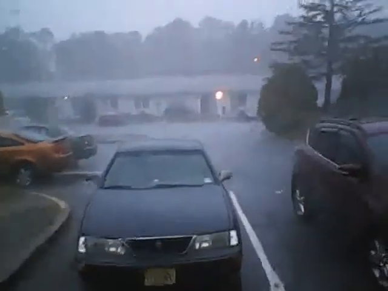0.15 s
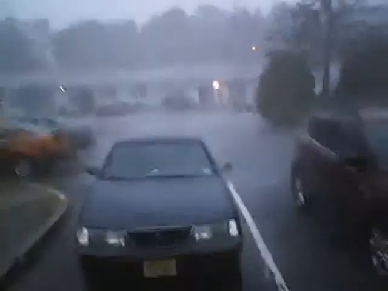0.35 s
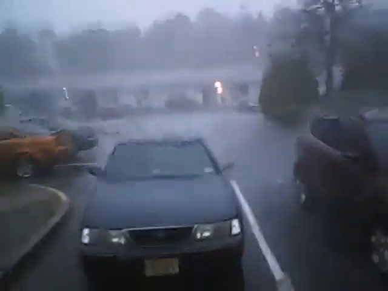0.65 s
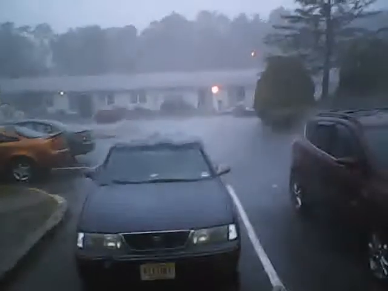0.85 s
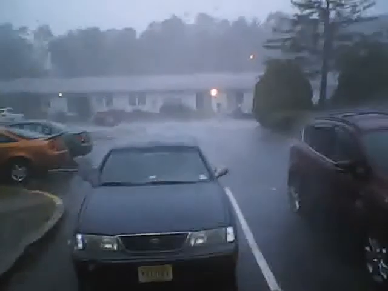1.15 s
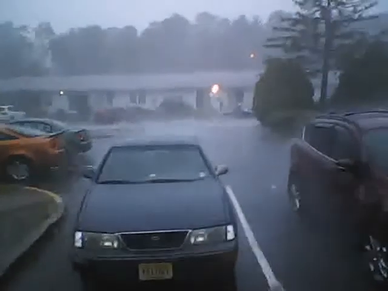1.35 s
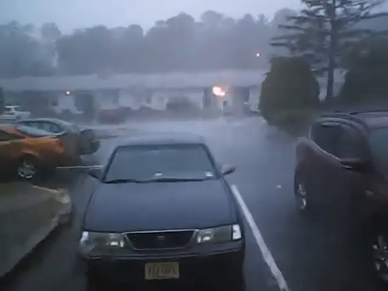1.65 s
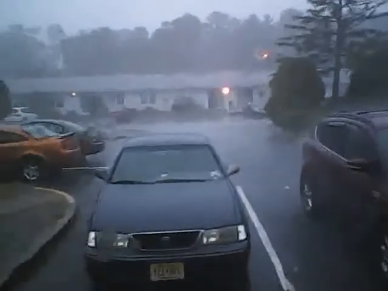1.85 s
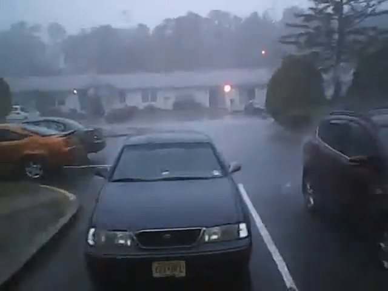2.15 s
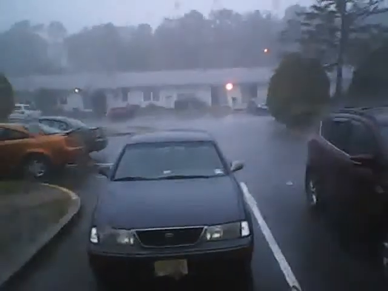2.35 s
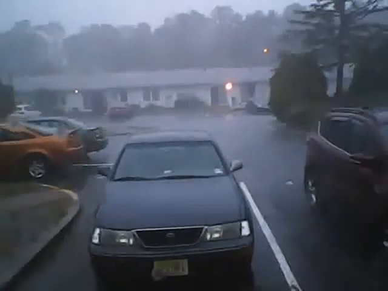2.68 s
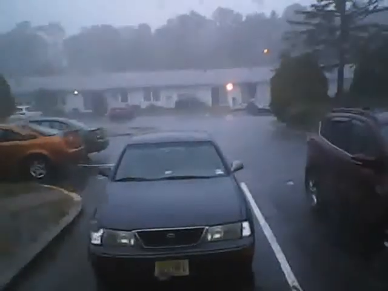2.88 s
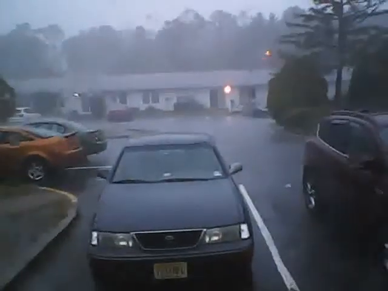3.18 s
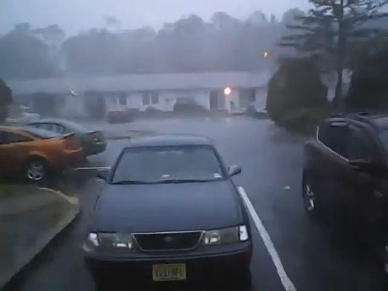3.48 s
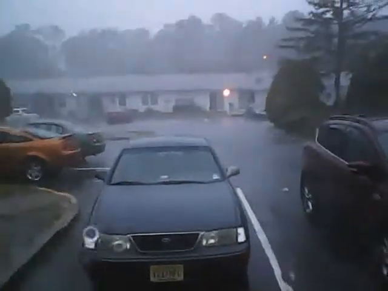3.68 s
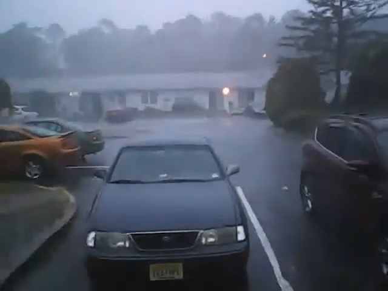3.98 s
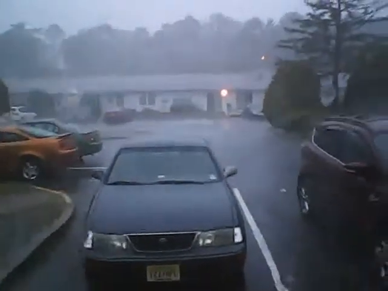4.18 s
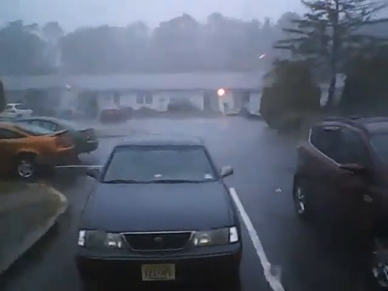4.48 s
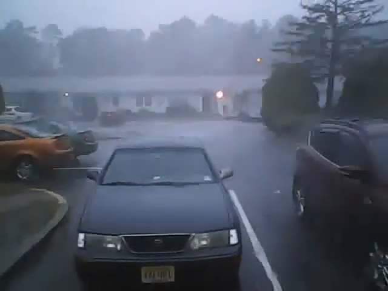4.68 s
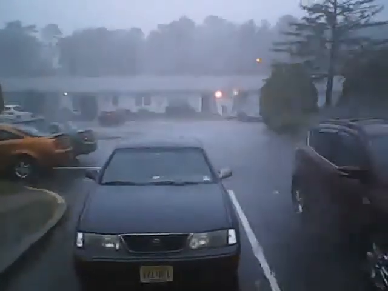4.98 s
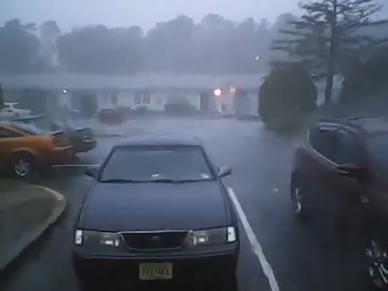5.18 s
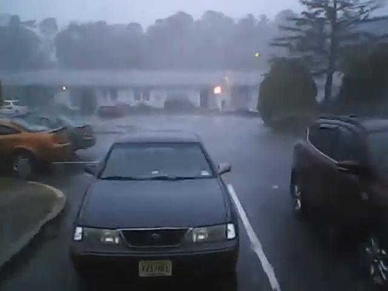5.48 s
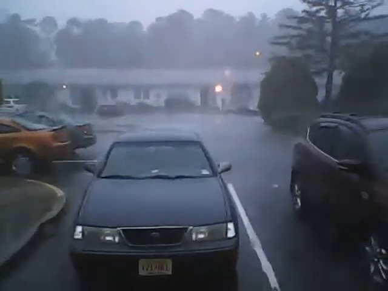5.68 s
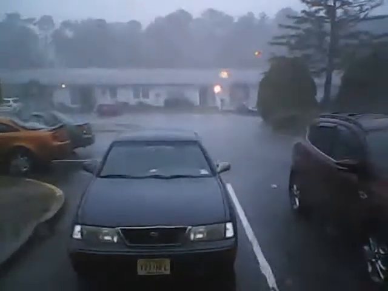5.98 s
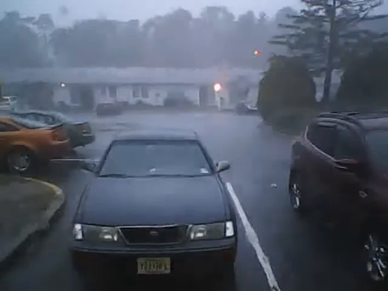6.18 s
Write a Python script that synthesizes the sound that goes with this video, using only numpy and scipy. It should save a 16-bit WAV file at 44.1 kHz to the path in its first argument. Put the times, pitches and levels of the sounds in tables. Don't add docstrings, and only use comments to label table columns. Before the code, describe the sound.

Heavy rain pours steadily on a parking lot, its wet asphalt, parked cars and trees, heard from under a shelter on a small handheld camera. A broad, even hiss of countless far drops runs throughout, thickened by a dense patter of nearer splats, over a low, uneven wind rumble that gusts gently. At about 0.25 s a sharp plastic click sounds as a hand shifts on the case, with a cluster of small ticks until 0.35 s. A short rub and more ticks come at 0.64-0.67 s, then faint ticks near 1.08 and 2.05 s. Brief low swells of booming rain on the shelter pass around 3.2 and 4.95 s. From about 3.4 s the downpour slowly strengthens, fullest near 6.1 s, then eases slightly by 6.3 s. The sound is boxy, with grainy, slightly broken treble that ends abruptly, and a barely audible, pulsing high whine.

```python
import sys
import numpy as np
from scipy import signal
from scipy.fft import rfft, irfft, next_fast_len
from scipy.io import wavfile
from scipy.ndimage import uniform_filter1d

SR = 44100
rng = np.random.default_rng(int(sys.argv[2]) if len(sys.argv) > 2 else 0)


def waveform_to_disk(signal):
    frames = np.transpose(np.atleast_2d(signal))
    scaled = np.clip(frames, -1, 1) * 32767
    samples = np.round(scaled).astype(np.int16)
    wavfile.write(sys.argv[1], SR, samples)


def how_loud(loudness_db):
    steps = np.asarray(loudness_db, float) / 20
    return 10 ** steps


N = 279153
WHINE_HZ = 10097.8


def evened(x):
    return x / np.sqrt(np.mean(x ** 2) + 1e-20)


def read(points, hz):
    f, value = np.transpose(points)
    return np.interp(np.log(hz + 1), np.log(f + 1), value)


def coloured(x, db_of):
    size = next_fast_len(N + 4096)
    gain = how_loud(db_of(np.fft.rfftfreq(size, 1 / SR)))
    return irfft(rfft(x, size) * gain, size)[..., :N]


def lift_db(humps, at):
    return sum(db / (1 + (2 * (at - centre) / width) ** 2) for centre, width, db in humps)


def downpour_db(t):
    # [t/s, level/dB]
    downpour = [(0, -46.5), (.25, -46), (.32, -44), (.44, -46), (1.13, -45.5), (1.36, -46.5), (1.9, -45.5),
                (2.1, -46.5), (3.12, -47), (3.21, -45.5), (3.42, -45), (3.81, -44.5), (4.62, -44),
                (4.9, -44.5), (5.73, -43.5), (6.12, -42), (6.33, -43.5)]
    return np.interp(t, *np.transpose(downpour))


def hiss(patchy_db=0.55, flicker_db=.5):
    frames = N // 128 + 9
    real, imaginary, patches = rng.standard_normal((frames, 257, 3)).T
    patches = uniform_filter1d(patches, size=6, axis=0)
    patches = evened(uniform_filter1d(patches, size=24, axis=1))
    flicker = evened(uniform_filter1d(rng.standard_normal(frames), size=8))
    spectra = (real + 1j * imaginary) * how_loud(patchy_db * patches + flicker_db * flicker)
    return evened(signal.istft(spectra, nperseg=512, noverlap=384)[1][:N])


def drops(per_s=2500, spread_db=0.0):
    size = how_loud(spread_db * np.minimum(rng.exponential(1, N), 5))
    size = size * (rng.random(N) < per_s / SR)
    pitches = np.geomspace(350, 9500, num=24)
    kind = rng.integers(0, len(pitches), N)
    out = np.zeros(N)
    for k, hz in enumerate(pitches):
        turns = np.arange(int(8 * SR / hz)) * hz / SR
        splat = turns * np.exp(-turns / 0.67) * np.sin(2 * np.pi * turns)
        splat = splat / np.sqrt(np.sum(splat ** 2) / hz)
        out += signal.oaconvolve(size * (kind == k), splat)[:N]
    return evened(out)


def rain(near_db=-8):
    # [f/Hz, level per Hz/dB]
    slope = [(150, -21.5), (250, -2.5), (457, -7.5), (943, -8.5), (1520, -9), (2010, -15), (3730, -13.5),
             (4290, -21.5), (6810, -20.5), (10000, -25.5), (13000, -54), (22000, -120)]
    # [t/s, length/s, lift/dB]
    on_roofs = [
        (.1, .1, 1),
        (.35, .3, -2),
        (1.06, .15, 0.5),
        (2, 0.4, 1.5),
        (5, 0.42, -1),
        (6.2, 0.22, 2.5),
    ]
    # [t/s, length/s, lift/dB]
    on_asphalt = [
        (.9, 1.9, -3),
        (2.5, 1.2, 3),
        (3.55, 0.18, 0.5),
        (4.3, 0.14, 0.5),
        (5.35, 0.38, 0.5),
    ]
    # [t/s, length/s, lift/dB]
    on_shelter = [
        (.45, 0.23, -2.5),
        (1.3, .2, 3.5),
        (2.95, 0.22, 2),
        (3.23, .15, 8),
        (4.3, 0.18, -8),
        (4.95, 0.17, 5.5),
        (6.25, 0.23, 3.5),
    ]
    # [t/s, length/s, lift/dB]
    in_trees = [
        (2.4, 2.0, -1.5),
        (4.0, .6, 0.48),
        (6.0, .8, 0.55),
    ]
    surfaces = [(on_roofs, 850, .5), (on_asphalt, 6500, .2), (on_shelter, 220, .4), (in_trees, 8200, .2)]
    t = np.arange(N) / SR
    both = evened(coloured(hiss() + how_loud(near_db) * drops(), lambda hz: read(slope, hz)))
    for sheets, centre_hz, octaves in surfaces:
        part = coloured(both, lambda hz: -6 * (np.log2((hz + 1) / centre_hz) / octaves) ** 4)
        both = both + (how_loud(lift_db(sheets, t)) - 1) * part
    return how_loud(downpour_db(t)) * both


def rumble(lumps_db=0.5):
    # [f/Hz, level per Hz/dB]
    wash_slope = [(3.5, -17), (6.0, -22), (16, -5.5), (32, -8), (181, -21), (234, -23), (303, -36),
                  (500, -51.5), (650, -67.5), (1100, -120)]
    # [t/s, lift/dB]
    gusts = [(.03, -5.5), (.12, 4.5), (.32, 1), (.68, 3), (1.04, 3.5), (1.28, 2.5), (1.6, 1.5), (1.85, 0.5),
             (2.43, 4), (2.6, -2.5), (2.7, 3), (3.21, 2.5), (3.47, 3), (3.58, -1), (3.67, 2), (3.79, -4.5),
             (3.86, 3), (4.1, 4), (4.25, 1), (4.6, 4.5), (5.43, 2), (5.75, 4), (6.15, 2)]
    calm_db, usual_rain_db = -41.5, -46
    follows, gust_s = 0.38, 0.11
    t = np.arange(N) / SR
    lumps = uniform_filter1d(rng.standard_normal(N), size=1800)
    lumps = evened(uniform_filter1d(lumps, size=900))
    wash = coloured(rng.standard_normal(N), lambda hz: read(wash_slope, hz))
    wind_db = calm_db + follows * (downpour_db(t) - usual_rain_db)
    wind_db = wind_db + lift_db([(s, gust_s, db) for s, db in gusts], t)
    return how_loud(wind_db + lumps_db * lumps) * evened(wash)


def whine(gated_db=-65, steady_db=-77, off_from=0.26, off_share=0.32):
    steady_hz, gate_per_s = 9600., 17.08
    t = np.arange(N) / SR
    on = 1. * ((t * gate_per_s - off_from) % 1 > off_share)
    on = uniform_filter1d(on, size=120)
    gated = how_loud(gated_db) * on * np.sin(2 * np.pi * WHINE_HZ * t)
    return gated + how_loud(steady_db) * np.sin(2 * np.pi * steady_hz * t)


def tick(db, centre_hz, octaves, length, ring_db, grit):
    # [f/Hz, level/dB, t60/s]
    case_modes = [(1050, 1.5, 0.039), (1360, 3, 0.0096), (2190, 8, 0.008), (3230, 0.5, 0.01),
                  (4025, -2.5, 0.016), (6500, 10, 0.0069)]
    t = np.arange(len(grit)) / SR
    u = t / max(length, 2e-5)
    snap = 3 * (t == 0) * (length < .0015)
    scrape = (np.sign(grit) * np.minimum(3 * u, 1) + snap) * np.exp(-u)
    edges = centre_hz * 2 ** (np.array([-.5, .5]) * max(octaves, .2))
    edges = np.clip(edges, 450, 12000)
    scrape = signal.sosfilt(signal.butter(3, edges, "bandpass", fs=SR, output="sos"), scrape)
    modes = np.zeros(len(t))
    for hz, level_db, t60 in case_modes:
        modes += how_loud(level_db - 60 * t / t60) * np.sin(2 * np.pi * hz * t) / np.sqrt(t60)
    ring = signal.fftconvolve(scrape, modes)[:len(t)]
    sound = scrape / abs(scrape).max() + how_loud(ring_db) * ring / abs(ring).max()
    return how_loud(db) * sound / abs(sound).max()


def case():
    # [t/s, peak level/dB, centre f/Hz, scrape length/s]
    touches = [(.1298, -33.5, 1280, .0005), (.2511, -12, 1540, .00005), (.2516, -31, 4200, 0.00054),
               (0.2613, -28.5, 8600, 0.0013), (0.2619, -24, 2600, 0.00017), (.2895, -26, 8000, 0.0013),
               (0.2897, -25.5, 1950, 0.00072), (.2895, -28, 4200, 0.0011), (.2935, -34.5, 4940, 0.0093),
               (0.324, -27.5, 3400, .0016), (.3233, -32, 6600, 0.0011), (0.3545, -33, 3170, 0.00088),
               (.639, -33, 6200, .017), (.639, -30.5, 1280, .0083), (.6418, -38, 2170, 0.00093),
               (.648, -36, 8000, .0057), (.6557, -23, 7600, 0.001), (.6558, -29, 4300, .0006),
               (.6671, -25, 2500, 0.0001), (.6683, -22, 3230, 0.00057), (1.0795, -26, 5800, 0.00052),
               (1.0794, -29, 1540, 0.00051), (1.08, -37, 7600, .0009), (1.08, -31, 2850, 0.00073),
               (2.054, -31, 5700, .0009), (2.0541, -29, 3250, 0.00056), (2.0555, -35.5, 1050, .001),
               (2.054, -39, 9000, .0012), (0.258, -27, 1050, 0.0015), (0.667, -36, 2130, .001)]
    narrow_octaves, wide_octaves = 0.49, 1.4
    snap_s, rub_s = 0.00032, 0.0051
    full_ring_db, rings_up_to_hz = -0.5, 3530
    loss_db_per_octave, rub_damping_db = 19, 15
    out = np.zeros(N)
    grit = rng.standard_normal((len(touches), 2600))
    for (s, db, hz, length), row in zip(touches, grit):
        rub = 1 / (1 + (rub_s / length) ** 3)
        snap = 1 / (1 + (length / snap_s) ** 3)
        octaves = narrow_octaves + wide_octaves * (rub + snap)
        ring_db = full_ring_db - loss_db_per_octave * max(np.log2(hz / rings_up_to_hz), 0) - rub_damping_db * rub
        out[round(s * SR):][:len(row)] += tick(db, hz, octaves, length, ring_db, row)
    return out


def scene():
    # [f/Hz, width/Hz, lift/dB]
    cavity = [(572, 53, 4), (945, 60, 2.5), (1533, 284, -8), (2027, 233, 7), (2950, 250, 3),
              (3360, 230, -5), (3740, 320, 2), (4836, 58, 7.5), (6820, 880, 2.5), (7520, 580, -3.5),
              (8850, 600, 3.5)]
    # [f/Hz, width/Hz, lift/dB]
    shelter = [(118, 10, 3), (207, 8, 3), (236, 16, 6), (785, 25, -3), (822, 25, 4), (1400, 25, 2)]
    weather = coloured(rain() + rumble(), lambda hz: lift_db(cavity, hz) + lift_db(shelter, hz))
    return (weather + case())[None]


def starve(x):
    # [f/Hz, added to the limit/dB]
    frail = [(4300, -3), (5000, -.6), (5500, .9), (6000, -.4), (6500, .6), (7200, -.5), (8000, -1.5),
             (8500, 1), (9000, -1.5), (10300, -2)]
    # [t/s, length/s, added to the limit/dB]
    short_spells = [
        (1.15, .15, .6),
        (1.7, .4, .5),
        (2.2, .4, .7),
        (3.3, .2, .8),
        (3.62, .3, 1.6),
        (4.45, .2, 2.2),
        (5.4, .15, 2),
    ]
    top_lost_s = [2.22, 2.64, 3.28, 3.32, 3.42, 4.17, 4.31]
    limit_db, eased_from_db, easing = -4.3, -44.8, 1.2
    hz, t, z = signal.stft(x, SR, nperseg=2048, noverlap=1024)
    band, starts = np.arange(len(hz)) // 4, np.arange(0, len(hz), 4)
    power = uniform_filter1d(np.add.reduceat(abs(z) ** 2, starts), size=2, axis=1)
    level_db = 10 * np.log10(abs(power) + 1e-20)
    usual_db = np.pad(level_db, [(0, 0), (10, 10)], "reflect")
    usual_db = signal.medfilt2d(usual_db, [1, 21])[:, 10:-10]
    limit = limit_db + lift_db(short_spells, t)
    limit = limit - easing * np.maximum(downpour_db(t) - eased_from_db, 0)
    weak = level_db - usual_db < limit + read(frail, hz[starts])[:, None]
    weak = (weak | np.roll(weak, -1, axis=1))[band] & (hz > 4300)[:, None]
    lost = abs(t[:, None] - top_lost_s).min(axis=1) < .024
    high = (hz > 9720) & (abs(hz - WHINE_HZ) > 45)
    top = lost & high[:, None]
    return signal.istft(z * ~(weak | top), SR, nperseg=2048, noverlap=1024)[1][:N]


def roll_off(x):
    return signal.sosfilt(signal.butter(12, 12400, fs=SR, output="sos"), x)


def record(dry):
    # [f/Hz, level/dB]
    leak = [(11000, -17), (11750, -17), (12050, -23.5), (12400, -38), (13000, -90)]
    gain_step_s, edge_hz = 3.2, 10345
    t = np.arange(N) / SR
    step = how_loud(1.35 * np.clip((t - gain_step_s) / .015, 0, 1))
    x = starve(dry[0] + step * whine())
    x = coloured(x, lambda hz: -np.clip(.5 * (hz - edge_hz + 20), 0, 90))
    flipped = x * (-1.) ** np.arange(N)
    mirror = coloured(flipped, lambda hz: read(leak, hz) - 90 * (hz < SR / 4))
    offset = -.0335 * step
    return roll_off((x + mirror + offset)[None])


dry = scene()
out = record(dry)
waveform_to_disk(out)
```